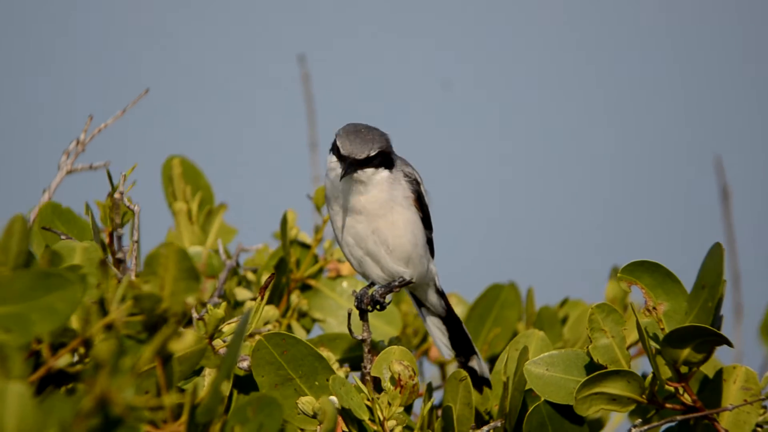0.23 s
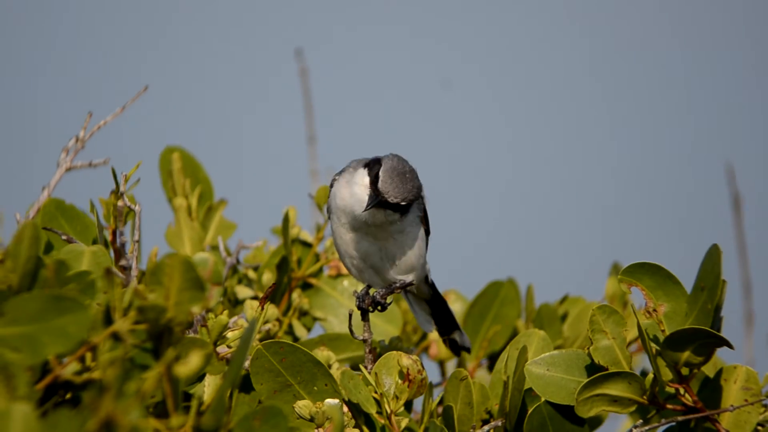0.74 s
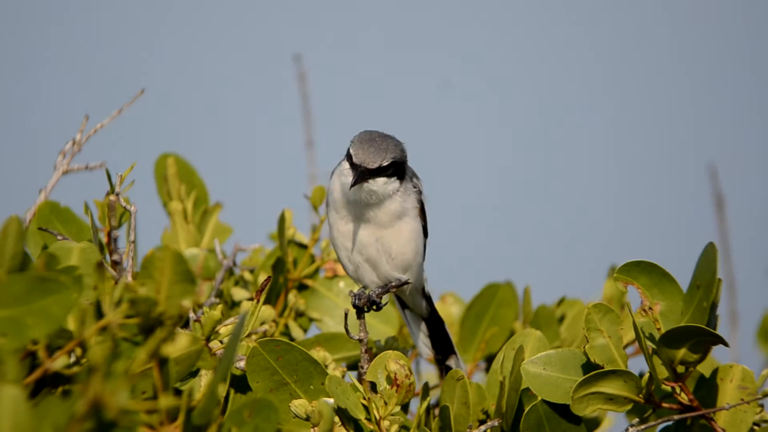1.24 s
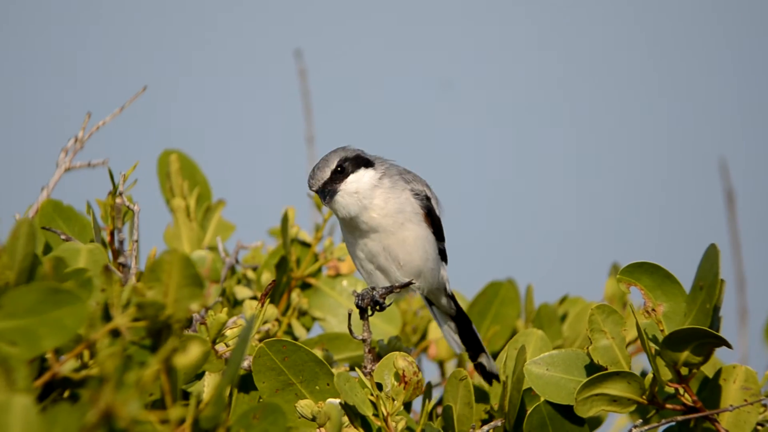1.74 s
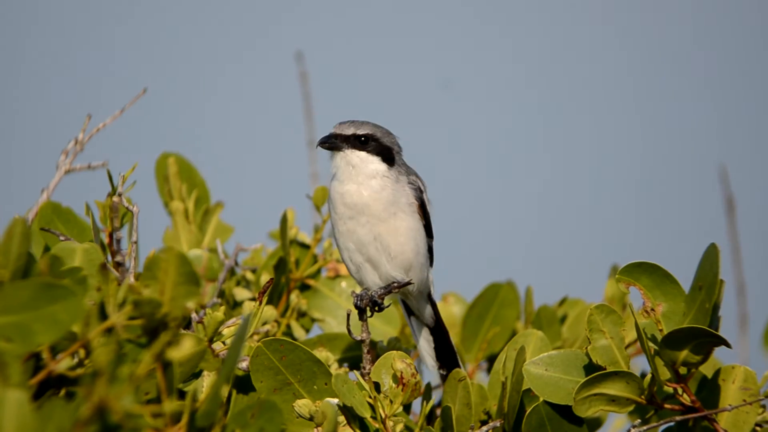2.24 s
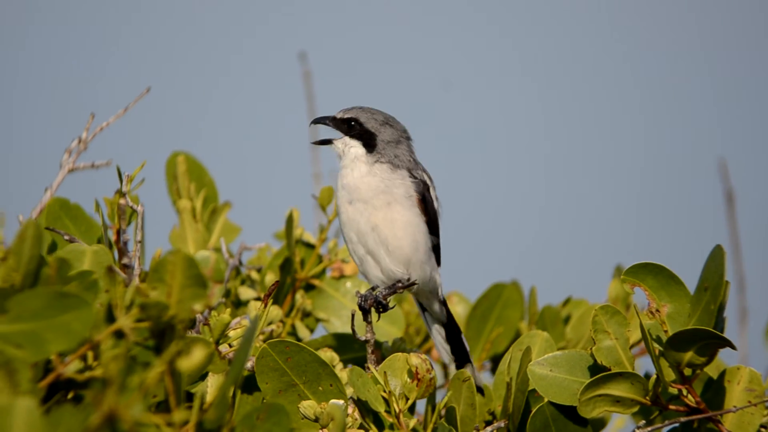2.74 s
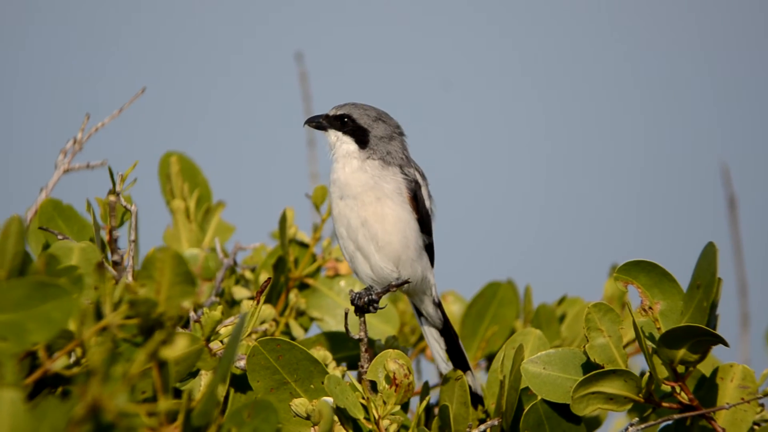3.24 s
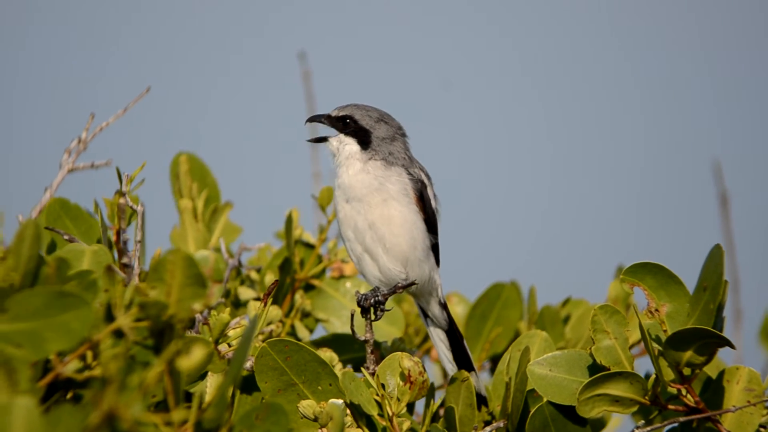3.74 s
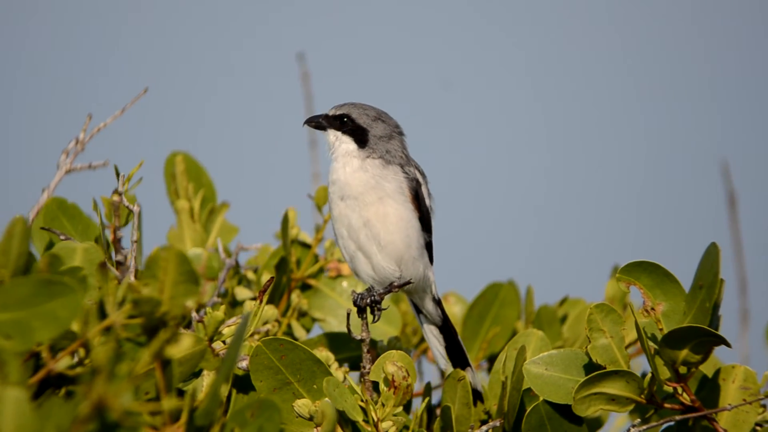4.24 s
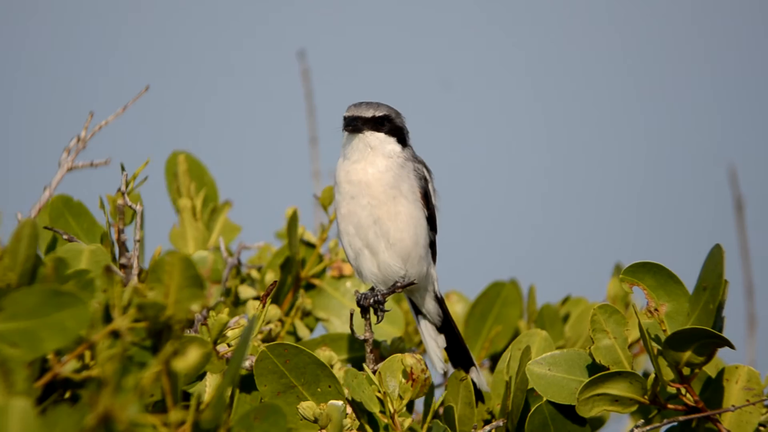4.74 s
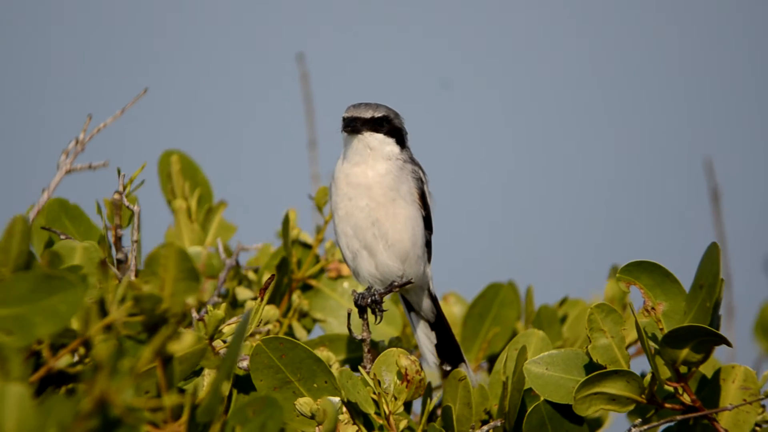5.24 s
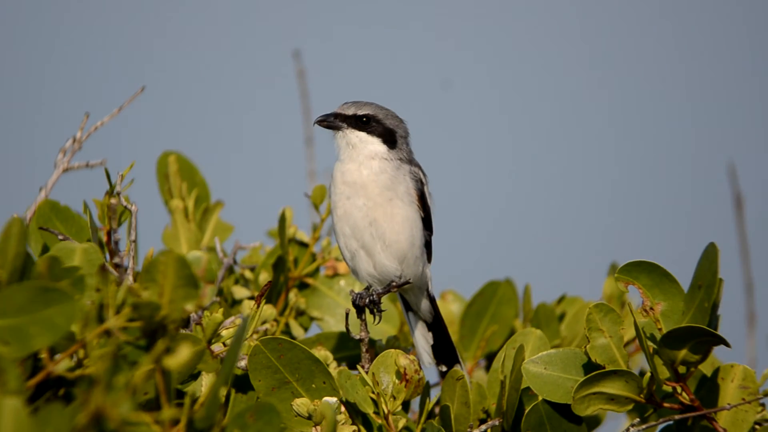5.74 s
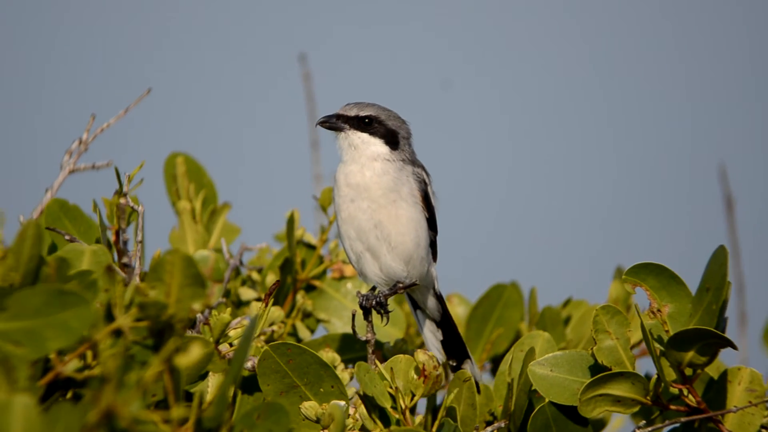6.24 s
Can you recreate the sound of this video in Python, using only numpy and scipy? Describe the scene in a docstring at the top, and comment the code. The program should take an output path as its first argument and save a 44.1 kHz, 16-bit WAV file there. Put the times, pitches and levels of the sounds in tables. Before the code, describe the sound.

A shrike gives four short, harsh, raspy calls outdoors while crickets trill, a katydid ticks and buzzes, and wind thumps the microphone.

```python
"""Shrike calls among insects and wind

Four harsh calls: pulses modulated by the interplay of two syrinx sides ring a throat filter.
The first two calls face the microphone; the last two are turned aside, with more echo from the bushes.
A cricket trills on a gliding tone before a blurred chorus; a katydid ticks, then buzzes, as shaped noise.
Wind rumbles as lumpy filtered noise and pops as push-and-suck pulses, over a soft wash of air."""
import sys
import numpy as np
from scipy import signal
from scipy.fft import rfft, irfft
from scipy.io import wavfile

SR = 44100
rng = np.random.default_rng(int(sys.argv[2]) if len(sys.argv) > 2 else 0)


def log_audio(samples):
    """Write samples as a 16-bit WAV file to the path given in sys.argv[1]."""
    # one column per channel
    frames = np.atleast_2d(samples).T
    # limit to full scale, then quantise
    limited = np.clip(frames, -1, 1)
    pcm = np.round(limited * 32767).astype(np.int16)
    wavfile.write(sys.argv[1], SR, pcm)


N = 286650
TIME_S = np.arange(N) / SR

# open air spectrum, with far-off insects in the treble: f/Hz, relative level/dB
AIR_SPECTRUM = [(30, 13.5), (400, 1.5), (560, 0.6), (750, 0), (950, -3.5), (1200, -6), (2000, -12),
                (3200, -19.5), (5200, -21.5), (6400, -14.5), (8500, -20), (10000, -26), (12000, -31),
                (15000, -37)]
# narrow notches left by the recorder's noise filter in the background: f/Hz, width/Hz, depth/dB
NOISE_FILTER_NOTCHES = [(5740, 170, 16), (6900, 70, 9), (15050, 200, 12)]
# cricket: t/s, level with chorus/dB, centre pitch f/Hz
CRICKET_CURVE = [(0.05, -73.5, 7400), (0.3, -62, 7330), (0.83, -59.5, 7300), (1.95, -60, 7350),
                 (2.6, -56.5, 7330), (3.2, -71.5, 7480), (3.55, -66, 7300), (4.15, -59.5, 7180),
                 (5.2, -55.5, 7290), (6.3, -56.5, 7390)]
# single swell of the other crickets: peak t/s, half-length/s, level re nearest/dB, rise/dB
CHORUS_SWELL = (1, 2.93, -10, 24)
# katydid buzz spectrum: f/Hz, relative level/dB
BUZZ_SPECTRUM = [(6500, -19), (8200, 5.5), (9300, 2.5), (10700, -8.5), (12300, -2), (14000, -6),
                 (15000, -7.5), (15700, -24)]
# katydid ticks: start t/s
TICK_TIMES_S = [3.0909, 3.1577, 3.1991, 3.2254, 3.3084, 3.3368, 3.4995, 3.5623, 3.6224, 3.6481]
# wind ahead of the microphone port: t/s, rumble level before trim/dB, flutter level/dB
WIND_CURVE = [(0, -41.5, -53), (0.3, -50, -56), (0.6, -38, -49.5), (1.0, -51.5, -55.5), (1.4, -45, -46),
              (1.9, -44.5, -57), (2.55, -45, -52), (2.85, -48, -58), (3.15, -45.5, -59.5),
              (3.7, -48.5, -67.5), (3.9, -57, -68), (4.35, -48, -66.5), (4.7, -45, -92), (5.0, -63, -60),
              (5.35, -49.5, -58), (5.6, -46, -52), (6.0, -39, -48.5), (6.5, -44.5, -53)]
# wind turbulence spectrum: f/Hz, relative level/dB
WIND_SPECTRUM = [(7.1, -41), (12, -14), (32, 8), (60, 7.5), (133, -5.5), (310, -16.5), (900, -9),
                 (1170, -55), (1980, -120)]
# strongest eddies ahead of the port: t/s, peak level/dB, centre f/Hz
STRONG_EDDIES = [(0.114, -32, 165), (0.182, -33.5, 292), (0.196, -26.5, 89), (0.551, -26.5, 62),
                 (0.733, -32.5, 132), (1.349, -27.5, 148), (1.5, -36, 156), (1.693, -25.5, 140),
                 (1.701, -22, 135), (2.393, -7, 254), (2.419, -17, 133), (2.523, -31.5, 68.6),
                 (3.123, -32.5, 117), (3.311, -34.5, 111), (3.468, -26, 177), (3.628, -32.5, 95),
                 (3.714, -28, 183), (4.189, -13.5, 217), (4.1913, -23.5, 700), (4.194, -23.5, 242),
                 (4.2, -21.5, 468), (4.217, -26, 79), (4.724, -32, 73), (4.813, -19, 220),
                 (4.825, -27, 137), (4.835, -18.5, 244), (5.629, -26, 120), (5.831, -28, 270),
                 (6.046, -26, 168), (6.102, -33.5, 177), (6.217, -21.5, 212)]
# calls: start t/s, length/s, relative effort/dB, swell/s, pitch f/Hz, pitch sag/share,
# surge/share, beak closing/share, treble brightness/dB
CALLS = [(0.402, 0.29, -28, 0.02, 685.3, 0.04, 0.036, 0.1, -11),
         (0.957, 0.28, -28, 0.046, 661.6, 0.0, 0.011, 0.042, -10.5),
         (2.741, 0.29, -31, 0.0181, 664, 0.092, 0.016, 0.018, -15.5),
         (3.691, 0.3, -30, 0.009, 689.6, 0.024, 0.0081, 0.0078, -16)]
# throat and beak gaping at the microphone: f/Hz, relative level/dB
THROAT_GAPING = [(900, -23), (1350, -17.5), (2350, -17.5), (2900, -6), (3600, 2), (4100, -6.5), (4600, 3.5),
                 (5250, 0), (5650, -15), (6200, -22), (6800, -31), (8700, -22.5), (10700, -42),
                 (14500, -53)]
# throat and beak less open, at the microphone: f/Hz, relative level/dB
THROAT_FACING = [(900, -9.5), (1350, -19), (2350, -13.5), (2800, -1.5), (3400, 4), (3900, -4), (4350, 3),
                 (5050, 5.5), (5400, -0.5), (5750, -21), (6450, -21), (6900, -27), (8250, -17.5),
                 (10200, -38), (14300, -47)]
# throat and beak turned aside: f/Hz, relative level/dB
THROAT_ASIDE = [(900, -19), (1350, -23.5), (2450, -22.5), (3100, -10.5), (3700, -0.5), (4100, -4),
                (4550, -10.5), (5050, 0.5), (5800, -16.5), (6450, -19), (6950, -27), (9700, -25),
                (11000, -37), (12200, -41), (15000, -55)]

AIR_MIDDLE_DB = -62  # 1-6 kHz band, before drift and gusts
BUZZ_FROM_S, BUZZ_TO_S = 4.0, 5.415
BUZZ_START_DB, BUZZ_SWELL_DB = -65.5, 6
FAINT_BUZZ_DB = -74  # katydid buzz going on faintly after the main buzz
WAKE_DB, WAKE_DECAY_S = -43.5, 0.029  # churning air behind each strong eddy
SWIRLS_PER_S, SWIRL_OVER_FLUTTER_DB, SWIRL_MEDIAN_HZ = 7, 9.5, 129  # weak eddies
START_SOFT_DB, START_FLAT_SHARE = 7, 0.085  # each call starts softer and flatter, then swells
DULLING_DB = 6  # treble lost over a call
SURGE_HZ, SURGE_CREST_S = 9.4, 0.044
PUSH_DB = 22  # level gained per unit of relative pitch
BEAK_HOLD_SHARE = 0.52  # share of a call before the beak starts to close
LEAD_S, LEAD_DB = 0.016, -17.5  # faint lead-in before the voice catches
BAND_EDGE_HZ = 15700


def gain_of(db):
    """Decibels to amplitude."""
    return 10 ** (np.asarray(db) / 20)


def evened(x):
    """Scales to rms 1."""
    return x / np.sqrt(np.mean(x ** 2) + 1e-20)


def read(points, hz):
    """Spectrum in dB, linear over log frequency."""
    f, db = np.transpose(points)
    return np.interp(np.log(hz + 1), np.log(f + 1), db)


def follow(rows, t):
    """Each column of a curve table at times t."""
    s, *columns = np.transpose(rows)
    return [np.interp(t, s, c) for c in columns]


def filtered(x, gain):
    """Applies a zero-phase gain, a function of frequency."""
    return irfft(rfft(x) * gain(np.fft.rfftfreq(len(x), 1 / SR)), len(x))


def below(x, edge_hz, order=8):
    """Low-pass."""
    return filtered(x, lambda hz: 1 / (1 + (hz / edge_hz) ** order))


def coloured(x, points):
    """Imposes a spectrum, at rms 1."""
    return evened(filtered(x, lambda hz: gain_of(read(points, hz))))


def wander(rate_hz, size):
    """Smooth random motion of rms 1."""
    return evened(below(rng.standard_normal(size), rate_hz, order=4))


def add(mix, start_s, sound):
    """Mixes a sound in, in place."""
    part = mix[max(round(start_s * SR), 0):][:len(sound)]
    part += sound[:len(part)]


def air(drift_db=1, gust_share=0.25):
    """Outdoor wash: shaped noise, drifting in level; its lower part rises with the wind."""
    wash = coloured(rng.standard_normal(N), AIR_SPECTRUM)
    middle = below(wash, 6000) - below(wash, 1000)
    _, gust_db = follow(WIND_CURVE, TIME_S)
    low = below(wash, 1900, order=4)
    gust_gain = gain_of(gust_share * (gust_db - gust_db.mean()))
    blown = wash - low + low * gust_gain
    level = gain_of(AIR_MIDDLE_DB + drift_db * wander(6.2, N))
    return level * blown / middle.std()


def cricket(chirps_hz=17.2, glide_hz=360):
    """Three wing strokes and a rest, each stroke sliding down in pitch; other crickets blur behind."""
    level_db, pitch_hz = follow(CRICKET_CURVE, TIME_S)
    peak_s, half_s, others_db, rise_db = CHORUS_SWELL
    swell = np.exp(-((TIME_S - peak_s) / half_s) ** 4)
    others = gain_of(others_db + rise_db * swell)

    strokes = 4 * np.cumsum(chirps_hz * (1 + 0.04 * wander(8, N))) / SR
    within = strokes % 1
    playing = strokes % 4 < 3
    song_hz = pitch_hz + glide_hz * (0.5 - within) + 70 * wander(298, N)
    envelope = np.sin(np.pi * within) ** 2 * playing * gain_of(1.46 * wander(29, N))
    song = envelope * np.sin(2 * np.pi * np.cumsum(song_hz) / SR)

    chorus_hz = pitch_hz + 90 * wander(202, N)
    chorus = wander(310, N) * np.sin(2 * np.pi * np.cumsum(chorus_hz) / SR)
    mix = (evened(song) + others * evened(chorus)) / np.hypot(1, others)
    return gain_of(level_db) * mix


def katydid(tick_db=-56, strokes_hz=64, tick_s=0.0017, edge_s=0.013):
    """Scraped wings: ticks, a swelling buzz, then a faint one; file strokes pulse it above 10.2 kHz."""
    scrape = coloured(rng.standard_normal(N), BUZZ_SPECTRUM)
    low = below(scrape, 10200, order=24)
    strokes = evened(1 + 0.85 * np.cos(2 * np.pi * strokes_hz * TIME_S))
    along = np.clip((TIME_S - BUZZ_FROM_S) / (BUZZ_TO_S - BUZZ_FROM_S), 0, 1)
    inside_s = np.minimum(TIME_S - BUZZ_FROM_S, BUZZ_TO_S - TIME_S)
    gate = np.clip(inside_s / edge_s + 0.5, 0, 1)
    level = gate * gain_of(BUZZ_START_DB + BUZZ_SWELL_DB * along ** 2)
    level += (TIME_S > BUZZ_TO_S) * gain_of(FAINT_BUZZ_DB)
    buzz = level * (low + strokes * (scrape - low))
    ticks = sum(np.exp(-abs(TIME_S - s - tick_s) / tick_s) for s in TICK_TIMES_S)
    return buzz + scrape * gain_of(tick_db) * ticks


def noise_filter(x):
    """The recorder's noise filter: cuts narrow Gaussian notches in the background."""
    def gain(hz):
        return gain_of(-sum(db * np.exp(-((hz - f) / width) ** 2) for f, width, db in NOISE_FILTER_NOTCHES))
    return filtered(x, gain)


def wind(rumble_trim_db=-0.6, lumpy_db=3):
    """Lumpy turbulence at the microphone: rumble and flutter bands, with a wake behind each strong eddy."""
    rumble_db, flutter_db = follow(WIND_CURVE, TIME_S)
    flow = coloured(rng.standard_normal(N), WIND_SPECTRUM) * gain_of(lumpy_db * wander(7.2, N))
    rumble = below(flow, 106.5, order=6)
    flutter = below(flow - rumble, 425, order=5)
    wakes = [(TIME_S > s) * np.exp(-abs(TIME_S - s) / WAKE_DECAY_S) for s, _, _ in STRONG_EDDIES]
    wake = gain_of(WAKE_DB) * np.max(wakes, axis=0)
    flutter_gain = np.hypot(gain_of(flutter_db), wake)
    return gain_of(rumble_db + rumble_trim_db) * evened(rumble) + flutter_gain * evened(flutter)


def eddies(reach=0.29, spread_db=3, spread_octaves=0.74):
    """Each eddy pushes, then sucks; fast ones pop higher. Weak ones fall at random and follow the wind."""
    out = np.zeros(N)
    t = np.arange(-SR // 25, SR // 25) / SR
    times_s = TIME_S[rng.random(N) < SWIRLS_PER_S / SR]
    strength, speed = rng.standard_normal((len(times_s), 2)).T
    _, flutter_db = follow(WIND_CURVE, times_s)
    swirl_db = flutter_db + SWIRL_OVER_FLUTTER_DB + spread_db * strength
    swirl_hz = SWIRL_MEDIAN_HZ * 2 ** (spread_octaves * speed)
    for s, db, hz in [*STRONG_EDDIES, *zip(times_s, swirl_db, swirl_hz)]:
        u = t * hz / reach
        push = -u / (1 + u ** 2 / 3) ** 4
        add(out, s + t[0], gain_of(db) * push / push.max())
    return out


def port(x, ring_hz=770, width_hz=130, lift=1.43, edge_hz=1200):
    """The microphone's opening rings faintly when blown on and damps the wind's treble."""
    b, a = signal.iirpeak(ring_hz, ring_hz / width_hz, fs=SR)
    return below(x + lift * signal.lfilter(b, a, x), edge_hz, order=8)


def syrinx(pitch_hz, ratio=1.335, pull=0.29, throb=0.22, quaver=0.0133, jitter=0.0156,
           beat_jitter=0.06, hiss=0.3, shimmer_db=1.0):
    """One side's pulses, pushed in phase and strength at its beat with the other, about a fourth up."""
    size = len(pitch_hz)
    unsteady = 1 + quaver * wander(41.7, size) + jitter * wander(228, size)
    phase = 2 * np.pi * np.cumsum(pitch_hz * unsteady) / SR
    beat_hz = (ratio - 1) * pitch_hz * (1 + beat_jitter * wander(215, size))
    beat = 2 * np.pi * np.cumsum(beat_hz) / SR
    pulled = phase + pull * np.sin(beat)
    pulses = evened(sum(np.cos(k * pulled) for k in range(2, 24)))
    breath = (1 + 0.81 * np.cos(pulled)) * rng.standard_normal(size)  # air escapes once a cycle
    strength = (1 + throb * np.cos(beat)) * gain_of(shimmer_db * wander(370, size))
    return (pulses + hiss * breath) * strength, phase  # phase without the pull


def through_throat(pulses, throat, opening_at, t):
    """Rings the pulses through causal, minimum-phase resonances that scale with beak opening."""
    hz, at_s, z = signal.stft(pulses, SR, nperseg=512, noverlap=384)
    opening = np.interp(at_s, t - t[0], opening_at)
    both_sides_hz = np.r_[hz, hz[-2:0:-1]][:, None]
    log_gain = np.log(gain_of(read(throat, both_sides_hz / opening)))
    z = z * np.exp(signal.hilbert(log_gain, axis=0).conj())[:len(hz)]
    return signal.istft(z, SR, nperseg=512, noverlap=384)[1][:len(t)]


def rasp(start_s, length_s, effort_db, swell_s, top_hz, sag, surge, closing, treble_db, throat,
         tremble=0.0044, attack_s=0.011, release_s=0.017, waver=0.0069, flutter_db=0.17,
         second_db=-27.0, third_db=-22.0):
    """One call: level and pitch swell, surge and sag together; resonances sink as the beak closes."""
    t = np.arange(-LEAD_S, length_s, 1 / SR)
    late = t / length_s - 0.5
    slack = np.exp(-np.maximum(t, 0) / swell_s)
    push = surge * np.cos(2 * np.pi * SURGE_HZ * (t - SURGE_CREST_S)) - sag * late
    level_db = effort_db - START_SOFT_DB * slack + PUSH_DB * push + flutter_db * wander(20, len(t))
    pitch_hz = top_hz * (1 - START_FLAT_SHARE * slack + push + waver * wander(21.5, len(t)))
    shut = np.maximum(t / length_s - BEAK_HOLD_SHARE, 0) / (1 - BEAK_HOLD_SHARE)
    beak = 1 - closing * (shut - shut.mean())
    bright_db = treble_db - DULLING_DB * late
    envelope = np.interp(t, [-LEAD_S, 0, attack_s, length_s - release_s, length_s],
                         [0, gain_of(LEAD_DB), 1, 1, 0])

    pulses, phase = syrinx(pitch_hz)
    opening = beak * (1 + tremble * wander(27, len(t)))
    voice = through_throat(pulses, throat, opening, t)
    body = below(voice, 6280, order=24)
    # low partials stay clear of the rasp
    clean = gain_of(second_db) * np.sin(2 * phase) + gain_of(third_db) * np.sin(3 * phase)
    voice = evened(body) + gain_of(bright_db) * evened(voice - body) + clean
    return start_s + t[0], gain_of(level_db) * envelope * voice


def foliage(x, far_db, near_db=-6, near_t60_s=0.04, far_t60_s=0.26):
    """Near leaves scatter the call; bushes further off leave a longer, duller tail."""
    t = TIME_S[:SR // 2]
    near, far = rng.standard_normal((2, len(t))) * (t > 0.001)
    near = near * gain_of(-60 * t / near_t60_s)
    far = below(far, 5900, order=4) * gain_of(-60 * t / far_t60_s)
    echoes = gain_of(near_db) * near / np.linalg.norm(near) + gain_of(far_db) * far / np.linalg.norm(far)
    return x + signal.fftconvolve(x, echoes)[:N]


def shrike(trim_db=-3.5, front_echo_db=-23, aside_echo_db=-15.0):
    """Four calls; with the head aside for the last two, more sound returns from the bushes."""
    front, aside = np.zeros((2, N))
    throats = [THROAT_GAPING, THROAT_FACING, THROAT_ASIDE, THROAT_ASIDE]
    for call, throat, toward in zip(CALLS, throats, [front, front, aside, aside]):
        add(toward, *rasp(*call, throat))
    return gain_of(trim_db) * (foliage(front, front_echo_db) + foliage(aside, aside_echo_db))


def scene():
    """Bird, insects and wind at one microphone."""
    background = noise_filter(air() + cricket() + katydid())
    blown = port(wind() + eddies())
    return (shrike() + blown + background)[None]


def record(dry):
    """The recorder's band limit: linear-phase low-pass."""
    taps = signal.firwin(511, BAND_EDGE_HZ, window=("kaiser", 9), fs=SR)
    return signal.oaconvolve(dry, taps[None], "same")


dry = scene()
out = record(dry)
log_audio(out)
```